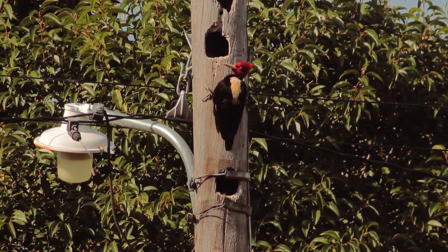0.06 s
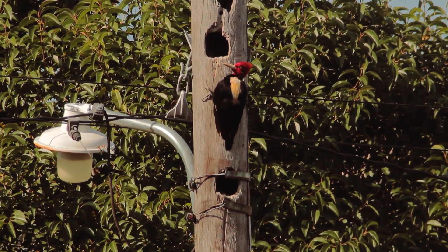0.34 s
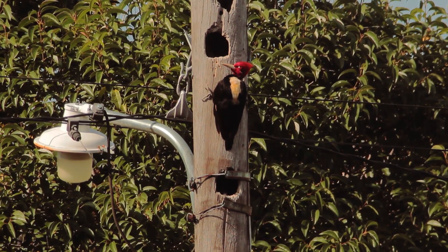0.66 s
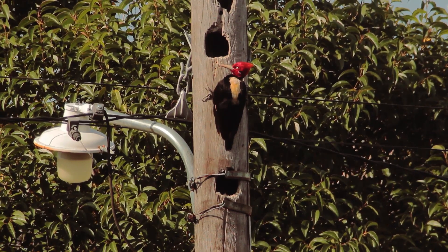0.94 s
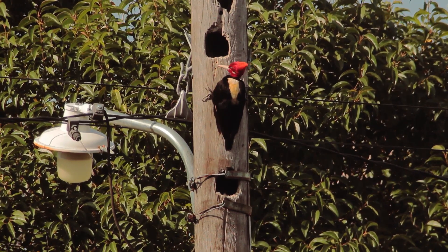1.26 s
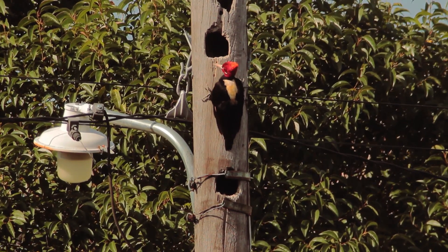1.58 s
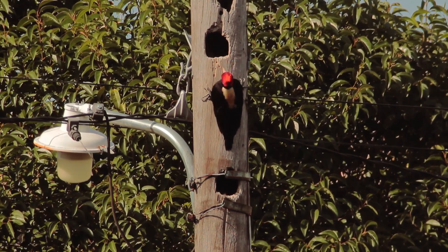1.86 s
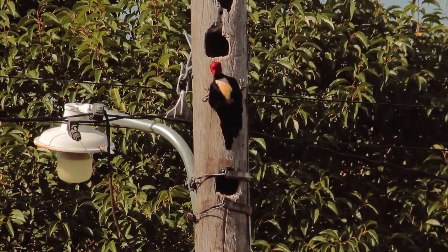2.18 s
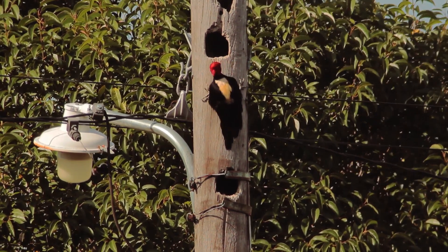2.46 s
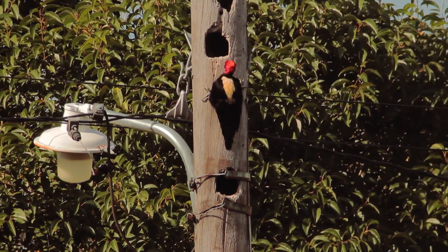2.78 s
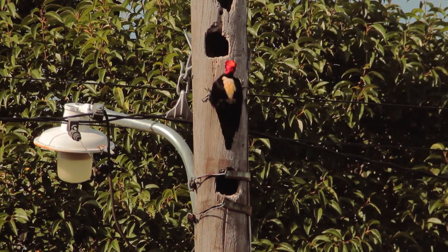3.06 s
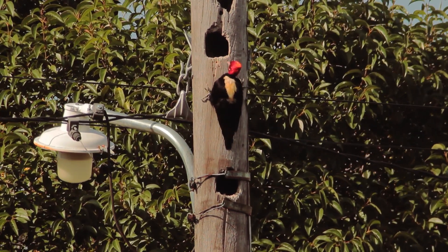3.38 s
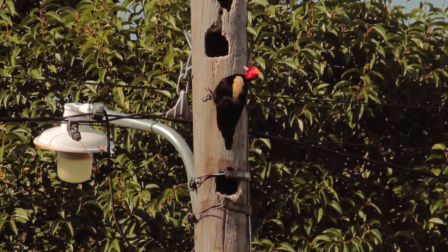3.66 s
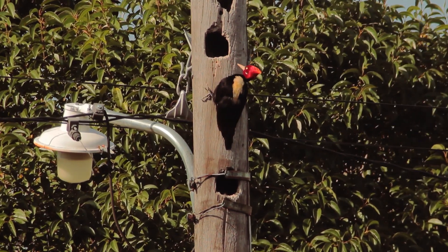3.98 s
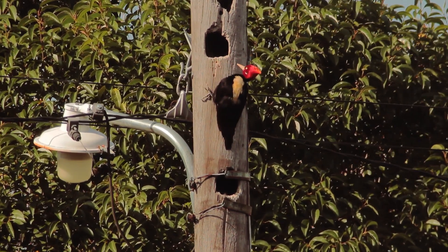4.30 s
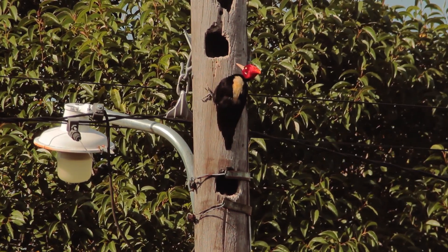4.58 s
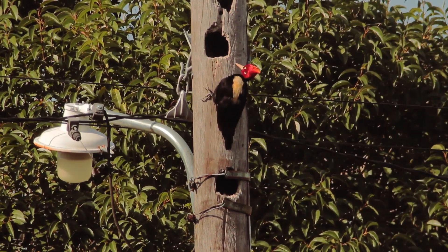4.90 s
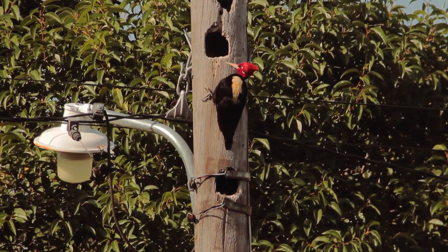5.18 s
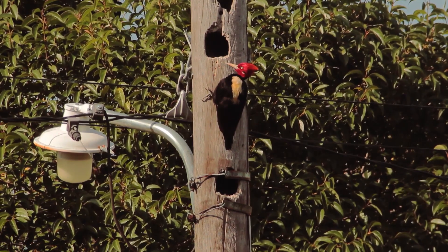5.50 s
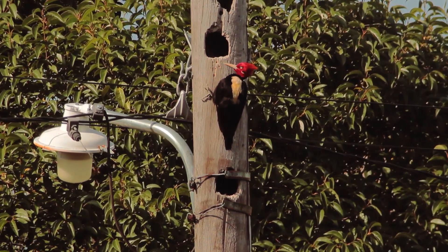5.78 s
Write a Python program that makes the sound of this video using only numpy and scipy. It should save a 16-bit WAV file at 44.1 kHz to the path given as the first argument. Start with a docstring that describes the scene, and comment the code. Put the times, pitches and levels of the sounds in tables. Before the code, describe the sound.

Outdoors among trees, a soft steady hiss runs throughout. A far dog woofs faintly, then a woodpecker strikes a hollow wooden pole with one loud, quick double knock that echoes briefly. The dog woofs twice more. A bird gives a quiet raspy screech that clears into a falling whistle, and a smaller bird chips once. Light wind nudges the microphone, and a faint tick on wood follows.

```python
"""A woodpecker knocks twice on a hollowed wooden utility pole, making it ring; the trees echo back.
Far off a dog woofs three times. A bird's voice organ shakes roughly, then settles, so its one screech
clears into a whistle. A smaller bird chips once, and later comes a faint tick on wood.
Light wind nudges the microphone, over soft outdoor air and a steady hiss."""
import sys
import numpy as np
from scipy import signal
from scipy.fft import rfft, irfft, next_fast_len
from scipy.io import wavfile
from scipy.ndimage import uniform_filter1d, map_coordinates

SR = 44100
rng = np.random.default_rng(int(sys.argv[2]) if len(sys.argv) > 2 else 0)


def inscribe(sig):
    """Save sig as 16-bit PCM at rate SR to the path in sys.argv[1].

    A 1-D sig is mono; a 2-D sig holds one channel per row.
    Samples are clipped to [-1, 1] before scaling.
    """
    pcm = np.round(np.clip(np.atleast_2d(sig).T, -1, 1) * 32767)
    wavfile.write(sys.argv[1], SR, pcm.astype(np.int16))


N = 257544

# How long sound lingers among the trees. Each row: frequency in Hz, seconds to fade by 60 dB.
TREE_FADES = [(200, 0.72), (500, 0.44), (1000, 0.7), (2000, 0.29), (8000, 0.13)]


def amp(db):
    """Turn decibels into a number to multiply a sound by."""
    return 10 ** (np.asarray(db) / 20)


def unit(x):
    """Scale a sound so that its average strength (rms) is 1."""
    return x / np.sqrt(np.mean(x ** 2) + 1e-20)


def along(points, hz):
    """Read between rows of (frequency in Hz, value), with octaves evenly spaced."""
    frequencies, values = np.transpose(points)
    return np.interp(np.log(hz + 1), np.log(frequencies + 1), values)


def ramp(t, length):
    """Rise smoothly from 0 at t = 0 to 1 at t = length."""
    return np.sin(np.pi / 2 * np.clip(t / length, 0, 1)) ** 2


def wobble(rate):
    """A smooth curve through `rate` random points a second."""
    points = rng.standard_normal(int(N * rate / SR) + 4)
    return map_coordinates(points, [np.arange(N) * rate / SR])


def filtered(x, response):
    """Multiply each frequency by response(hz); complex values also shift it in time."""
    size = next_fast_len(N + SR // 2)
    return irfft(rfft(x, size) * response(np.fft.rfftfreq(size, 1 / SR)), size)[..., :N]


def noise(colour):
    """Noise of strength 1, shaped by rows of (frequency in Hz, relative level in dB)."""
    return unit(filtered(rng.standard_normal(N), lambda hz: amp(along(colour, hz))))


def tone(pitch, partials):
    """A tone of strength 1: sine waves at multiples of a moving pitch."""
    phase = 2 * np.pi * np.cumsum(pitch) / SR
    return unit(sum(amp(db) * np.sin(multiple * phase) for multiple, db in partials))


def scatter(x, fades, build_s):
    """A stereo wash of echoes; each row of fades gives Hz and seconds to fade by 60 dB."""
    hz, t, spectrum = signal.stft(rng.standard_normal((2, SR)), SR, nperseg=256)
    tail = signal.istft(spectrum * amp(-60 * t / along(fades, hz)[:, None]), SR, nperseg=256)[1]
    tail *= 1 - np.exp(-(np.arange(tail.shape[1]) / SR / build_s) ** 2)
    mid, side = signal.fftconvolve(x[None], tail / np.linalg.norm(tail[0]), axes=1)[:, :N]
    side = filtered(side, lambda hz: hz / np.hypot(hz, 1300))  # long waves reach both ears alike
    return np.array([mid + side, mid - side])


def air(ripple_db=0.32, ripple_hz=2350, ripple_fade_hz=7000):
    """A distant outdoor murmur and an even hiss that sounds slightly hollow."""
    # The air both ears share. Each row: frequency in Hz, relative level in dB.
    shared_colour = [(53, -19), (90, -2), (161, -3), (195, -4.5), (443, -5.5), (483, -2), (527, -4.5),
                     (1000, -2.5), (2090, -10), (2890, -5.5), (3820, -9), (4950, -7), (5750, -9.5),
                     (6840, -9), (15500, -11)]
    # The air that differs between the ears. Each row: frequency in Hz, relative level in dB.
    side_colour = [(35, -31), (60, 1), (215, -1.5), (253, -1), (285, -4.5), (433, -3.5), (533, -4.5),
                   (1020, -6.5), (1100, -7), (1700, -7.5), (2050, -7.5), (3340, -8), (6260, -9),
                   (14500, -10), (15500, -11)]
    mid, side = amp(-49) * noise(shared_colour), amp(-49.5) * noise(side_colour)
    depth_db = lambda hz: ripple_db * np.exp(-hz / ripple_fade_hz)
    mid = filtered(mid, lambda hz: amp(depth_db(hz) * np.cos(2 * np.pi * (hz - 500) / ripple_hz)))
    return np.array([mid + side, mid - side])


def wind(breeze_db=-64, swing_db=3, side_db=-24):
    """Swirls of air rumble on the microphone, in a wandering breeze and a few puffs."""
    # Puffs of wind. Each row: time of the peak in seconds, level in dB, half-width in seconds.
    gusts = [(1.155, -53, 0.027), (3.65, -48, .025), (3.725, -44, 0.029), (4.2, -47.5, 0.086),
             (4.372, -38.5, 0.027), (4.455, -42, 0.037), (5.34, -54.5, .06), (5.51, -53, 0.026)]
    # The low rumble of the swirls. Each row: frequency in Hz, relative level in dB.
    rumble_colour = [(10, -7), (22, -2), (45, 2), (65, -6), (105, -17), (170, -28), (300, -48), (550, -120)]
    t = np.arange(N) / SR
    breeze = amp(breeze_db + swing_db * wobble(9))
    puffs = sum(amp(db) * np.exp(-((t - peak_s) / width) ** 2) for peak_s, db, width in gusts)
    swirls = noise(rumble_colour)
    local_power = np.abs(uniform_filter1d(swirls ** 2, size=2600))
    swirls = unit(swirls / np.sqrt(local_power + .05))  # makes them about equally strong
    side = amp(side_db) * noise(rumble_colour)
    return np.hypot(breeze, puffs) * np.array([swirls + side, swirls - side])


def dog(pitch_drop=.3, echo_s=.07, echo_db=-15, trees_db=-13):
    """Effort swells and drops in each woof, taking pitch and loudness along; echoes answer."""
    # A far dog's woofs. Each row: middle in seconds, length in seconds, pitch at the middle in Hz,
    # glide in Hz per second, level in dB, roughness from 0 to 1.
    woofs = [(1.767, 0.17, 490.4, 0.5, -51.5, 0.12), (2.457, .095, 370, -1100, -56.5, 0.01),
             (2.763, .16, 517, 0, -41.5, 0.03)]
    # The tones in its voice. Each row: multiple of the pitch, relative level in dB.
    partials = [(1, -4), (2, -16), (3, -20)]
    voice, t = np.zeros(N), np.arange(N) / SR
    for middle_s, length, middle_hz, glide, db, roughness in woofs:
        effort = np.clip(1 - (2 * (t - middle_s) / length) ** 2, 0, 1)
        pitch = (middle_hz + glide * (t - middle_s)) * (1 - pitch_drop * (1 - effort))
        pitch *= 1 + roughness * wobble(250)
        voice += amp(db) * effort ** 1.34 * tone(pitch, partials)
    echo = filtered(voice, lambda hz: amp(echo_db) * np.exp(-2j * np.pi * hz * echo_s))
    return voice + echo + amp(trees_db) * scatter(voice, TREE_FADES, build_s=.013)


def woodpecker(crack_fade_s=.039):
    """Two blows of the bill ring the pole; the rebound is softer and so duller."""
    # The blows. Each row: start in seconds, relative level in dB, Hz above which the blow is weak.
    knocks = [(2.1673, -7.1, 2650), (2.2252, -9.3, 1360)]
    # The ringing tones of the pole and its hollows. Each row: frequency in Hz, relative level in dB,
    # seconds to fade by 60 dB, seconds to build up.
    pole_tones = [(241, -29, .096, .0018), (483, 4.8, .033, .004), (712, -4.5, .03, .0006),
                  (925, -18, .056, .0018), (1022, -15.5, .044, .0002), (1205, -8, .037, .0005),
                  (1428, -17, .025, .0018), (1783, -7.6, .02, .0018), (1915, -19, .056, .0016),
                  (2126, -10, .014, .0015), (2454, -18.6, .033, .0036), (2700, -25, .025, .002),
                  (2950, -23, .025, .002), (3750, -27, .02, .001)]
    # The knock as the leaves throw it back. Each row: frequency in Hz, relative level in dB.
    leaf_colour = [(150, -29), (270, 1), (360, -11), (500, 8), (750, 2), (1200, -6), (1550, -5),
                   (1900, -2.5), (2800, -16), (5000, -26), (12000, -45)]
    wood, blows, t = np.zeros(N), np.zeros(N), np.arange(SR // 4) / SR
    crack_band = signal.butter(2, [1800, 4200], "bandpass", fs=SR)
    for start_s, blow_db, dull_hz in knocks:
        strength = lambda hz: amp(blow_db) / np.hypot(1, (hz / dull_hz) ** 2)
        start = round(start_s * SR)
        for k, (hz, db, fade_s, build_s) in enumerate(pole_tones):
            swell = 1 - np.exp(-(t / build_s) ** 2)  # the hollow takes a moment to ring
            ring = swell * amp(db - 60 * t / fade_s) * np.sin(2 * np.pi * hz * t)
            wood[start:][:len(t)] -= (-1) ** k * strength(hz) * ring
        crack = unit(signal.lfilter(*crack_band, rng.standard_normal(len(t))))
        wood[start:][:len(t)] += strength(2700) * amp(-29 - 60 * t / crack_fade_s) * crack
        blows[start] = strength(1040)
    thrown_back = filtered(blows, lambda hz: amp(along(leaf_colour, hz)))
    leaves = amp(11.5) * scatter(thrown_back, [(500, .19), (3000, .16)], build_s=.007)
    trees = amp(3.5) * scatter(thrown_back, TREE_FADES, build_s=.039)
    return wood + near_echoes(wood) + leaves + trees


def near_echoes(x, ear_shift_s=.00008):
    """Sound bounces off the ground and nearby walls, reaching the left or right ear first by turns."""
    # The bounces. Each row: delay in seconds, level in dB compared with the direct sound.
    bounces = [(.004, -15.4), (.0129, -13), (.0289, -16.3), (.0352, -21)]
    ears = np.array([[-ear_shift_s], [ear_shift_s]])
    return filtered(x, lambda hz: sum(amp(db) * np.exp(-2j * np.pi * hz * (delay + (-1) ** k * ears))
                                      for k, (delay, db) in enumerate(bounces)))


def screech_pitch(start_s, top_hz=1875, top_s=3.42, scoop_hz=279.5, sag_hz_per_s=470):
    """The screech's pitch scoops up from below, then sags."""
    t = np.arange(N) / SR
    scoop = scoop_hz * np.exp(-np.maximum(t - start_s, 0) / .04)
    return top_hz - scoop - sag_hz_per_s * np.clip(t - top_s, 0, 1)


def screech_loudness(pushes, rasp_rise_s=.033, rasp_hold_s=.016, whistle_rise_s=.05):
    """In each push of the screech the rasp comes first and dies as the whistle takes over."""
    whistle, rasp, t = np.zeros(N), np.zeros(N), np.arange(N) / SR
    for start_s, length, clear_s, rasp_db, whistle_db in pushes:
        age = t - start_s
        ending = ramp(length - age, .014)
        rasp_fade_db = 143 * np.maximum(age - rasp_rise_s - rasp_hold_s, 0)
        rasp += ending * ramp(age, rasp_rise_s) * amp(rasp_db - rasp_fade_db)
        whistle_rise = ramp(age - clear_s + whistle_rise_s, whistle_rise_s)
        whistle_fade_db = 50 * np.maximum(age - clear_s, 0)
        whistle += ending * whistle_rise * amp(whistle_db - whistle_fade_db)
    return whistle, rasp


def screeching_bird(waver=.00426, chaos=.06):
    """The bird's voice organ first shakes roughly, then settles on a clean falling whistle."""
    # The two pushes of the screech. Each row: start in seconds, length in seconds,
    # seconds until it clears, rasp level in dB, whistle level in dB.
    pushes = [(3.224, 0.083, 0.062, -42, -45), (3.296, 0.42, .11, -41.5, -47)]
    # The tones in the whistle. Each row: multiple of the pitch, relative level in dB.
    whistle_partials = [(1, -6), (2, 1), (3, -14)]
    # The rough tones in the rasp. Each row: multiple of the pitch, relative level in dB.
    rasp_partials = [(1, -4), (1.47, -1), (1.801, -3), (2.1, -1.5), (2.5, -3), (2.9, -1), (4.3, -7)]
    pitch = screech_pitch(start_s=pushes[0][0])
    whistle_gain, rasp_gain = screech_loudness(pushes)
    whistle = tone(pitch * (1 + waver * wobble(200)), whistle_partials)
    rasp = sum(amp(db) * tone(pitch * (1 + chaos * wobble(1200)), [(multiple, 0)])
               for multiple, db in rasp_partials)
    flutter = amp(3.3 * wobble(150))
    call = whistle_gain * whistle + rasp_gain * unit(rasp * flutter)
    lead_s = np.array([[1.5], [-1.5]]) / SR  # the bird sits to the left: that ear hears it first
    direct = amp([[0], [-2]]) * filtered(call, lambda hz: np.exp(2j * np.pi * hz * lead_s))
    return direct + amp(-6) * scatter(call, [(2000, .62), (6000, .46)], build_s=.0085)


def small_bird(tuning=.96):
    """One thin, clean chip slides downward and echoes in the trees."""
    # The chip's path. Each row: time in seconds, pitch in Hz before tuning, relative level in dB.
    path = [(3.56, 5350, -72), (3.595, 5200, -60), (3.625, 4850, -57), (3.655, 4300, -66)]
    times, pitches, levels = np.transpose(path)
    t = np.arange(N) / SR
    pitch, db = np.interp(t, times, pitches), np.interp(t, times, levels)
    singing = (t > times[0]) & (t < times[-1])
    chip = singing * amp(db) * tone(pitch, [(tuning, 0)])
    return amp(-3) * chip + amp(-8) * scatter(chip, TREE_FADES, build_s=.02)


def wood_tap(fade_s=.1):
    """A light tap on wood gives a dry tick that dies quickly."""
    # The tap. Each row: start in seconds, level in dB.
    taps = [(4.917, -44)]
    # The woody sound of the tick. Each row: frequency in Hz, relative level in dB.
    tick_colour = [(150, -8), (400, 3), (800, -8), (1300, -1), (2000, 2), (2600, -13), (3600, -6),
                   (6000, -25), (12000, -50)]
    t = np.arange(N) / SR
    loudness = sum((t > start_s) * amp(db - 60 * np.abs(t - start_s) / fade_s) for start_s, db in taps)
    return loudness * noise(tick_colour)


def scene():
    """Everything as heard from the foot of the pole."""
    return air() + wind() + dog() + woodpecker() + screeching_bird() + small_bird() + wood_tap()


def record(dry, top_hz=15800):
    """Cut away the very highest treble."""
    return filtered(dry, lambda hz: hz < top_hz)


dry = scene()
out = record(dry)
inscribe(out)
```